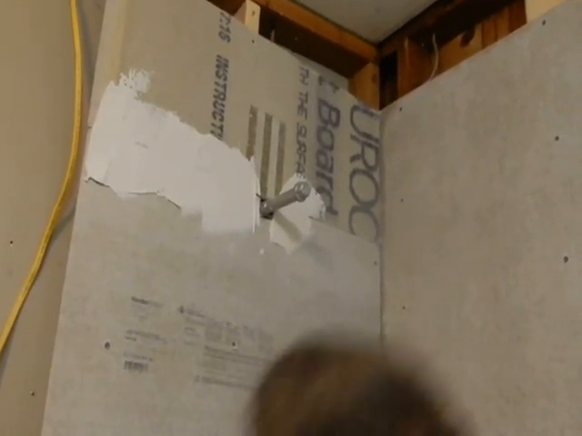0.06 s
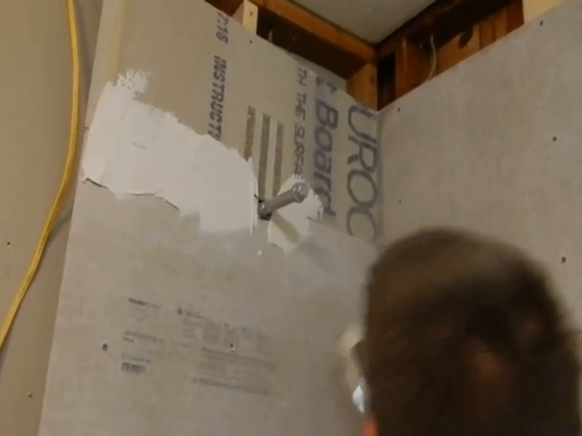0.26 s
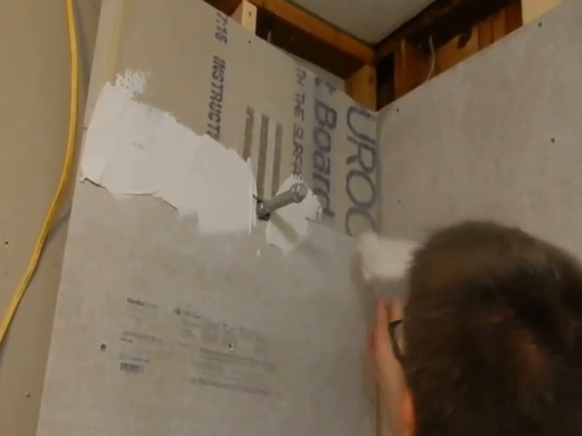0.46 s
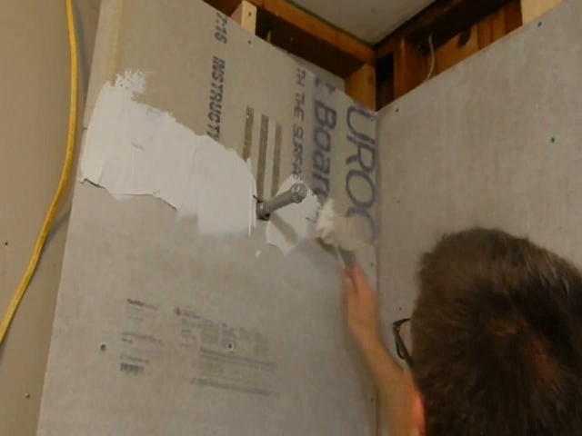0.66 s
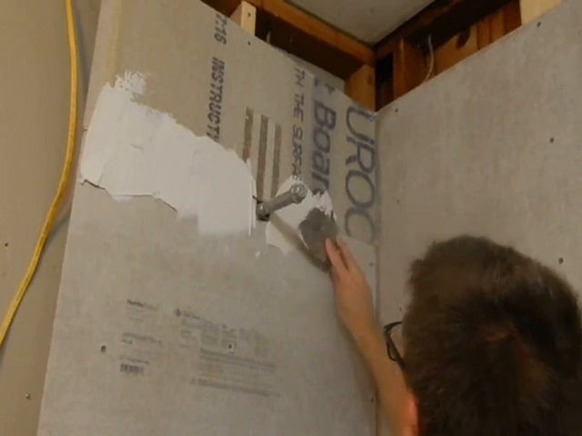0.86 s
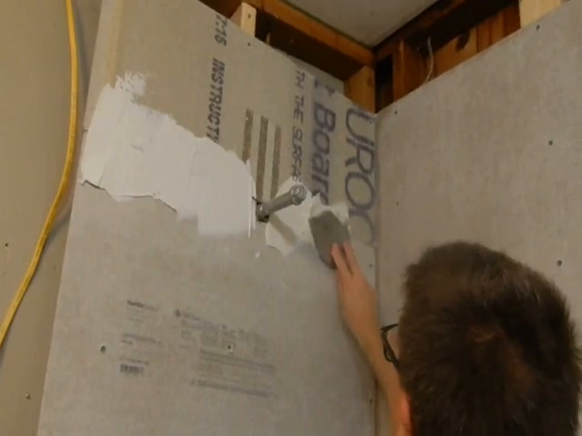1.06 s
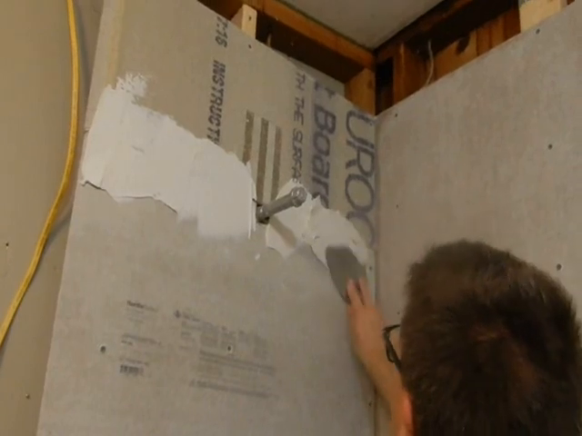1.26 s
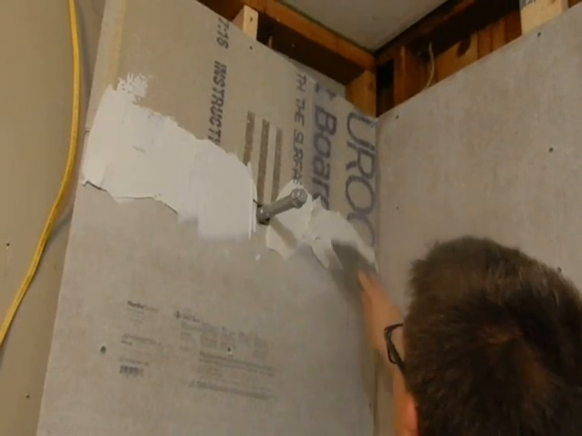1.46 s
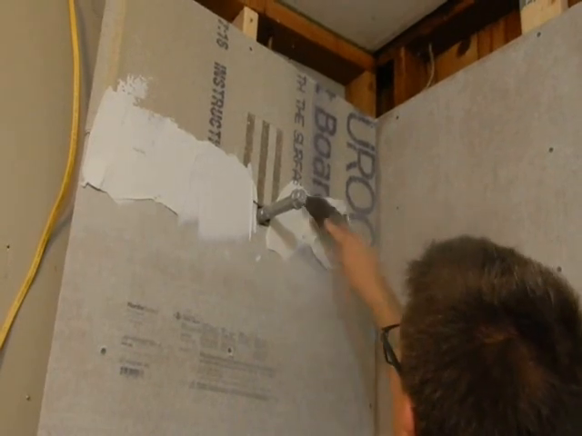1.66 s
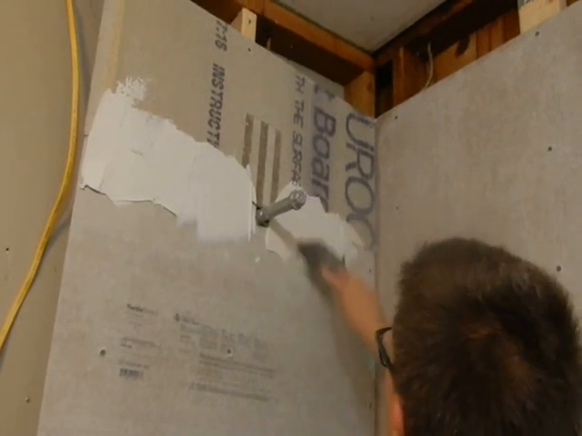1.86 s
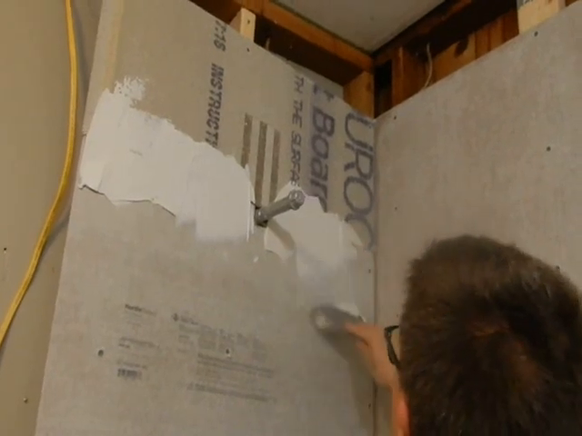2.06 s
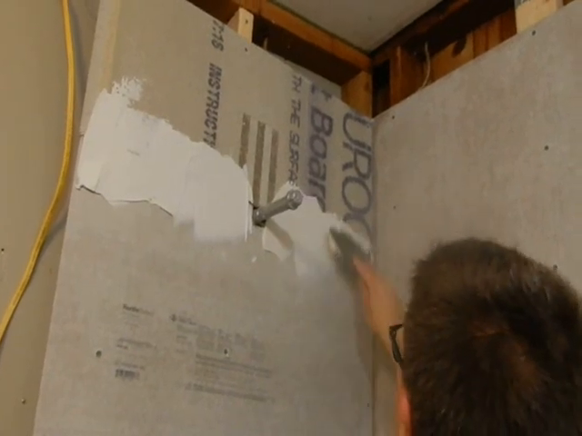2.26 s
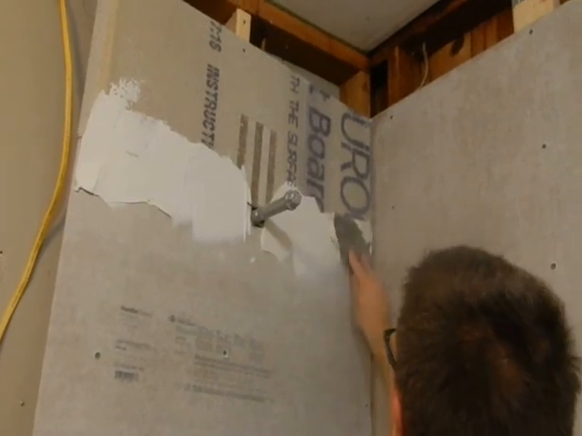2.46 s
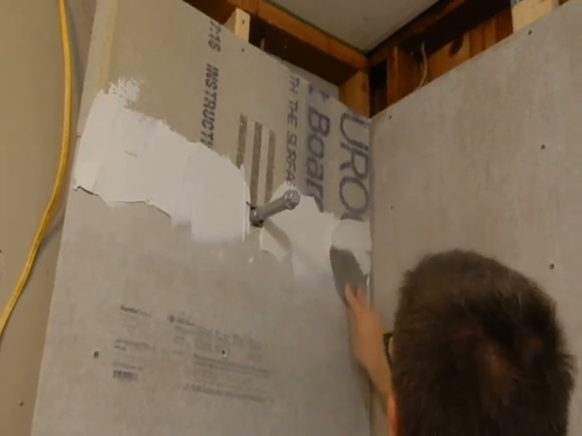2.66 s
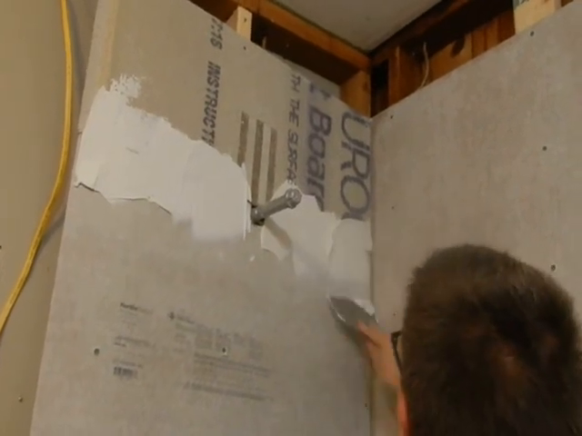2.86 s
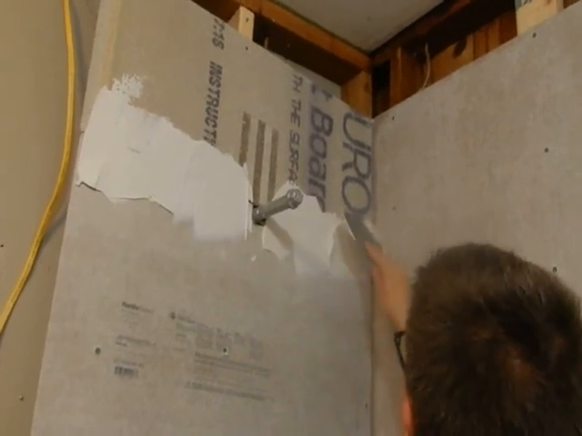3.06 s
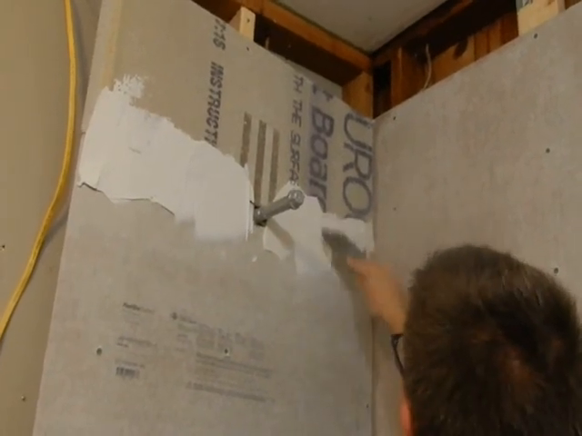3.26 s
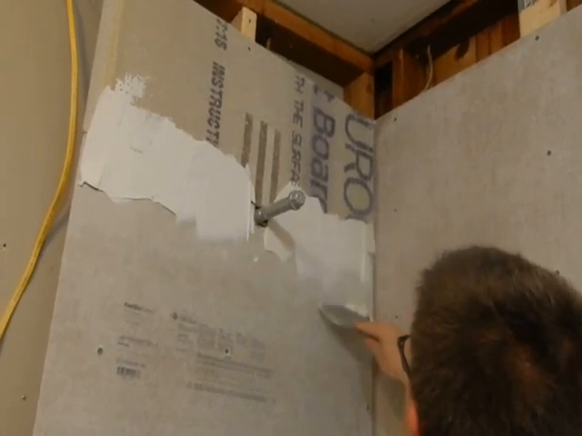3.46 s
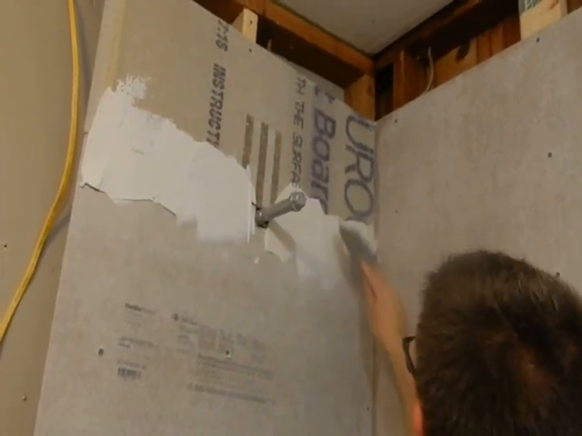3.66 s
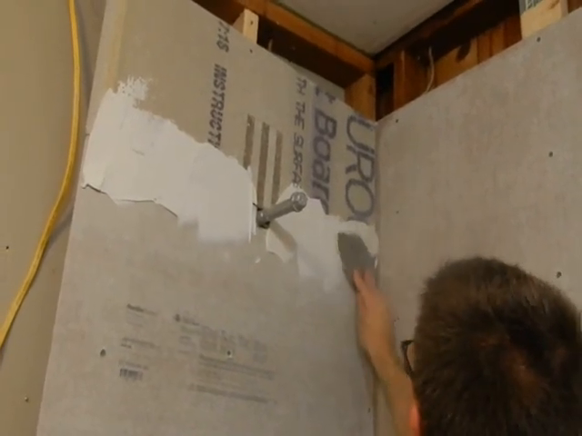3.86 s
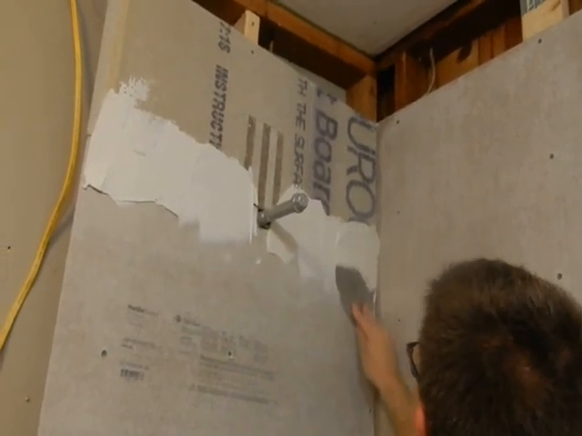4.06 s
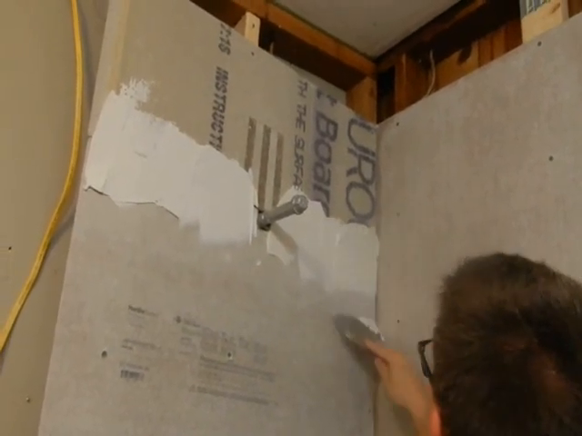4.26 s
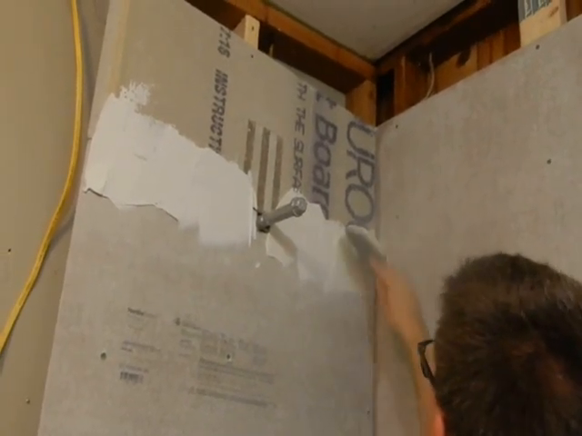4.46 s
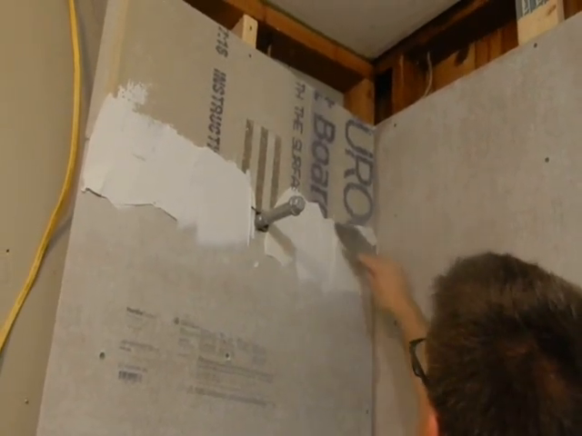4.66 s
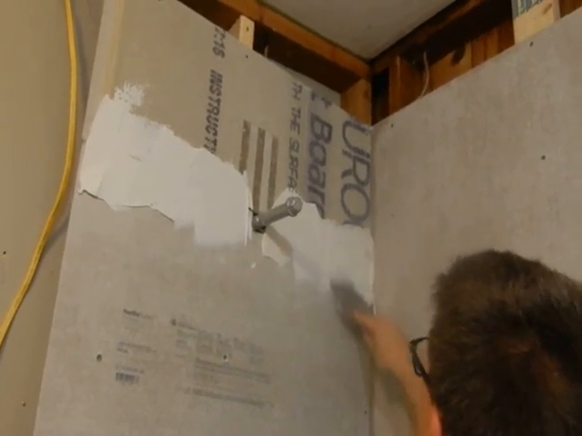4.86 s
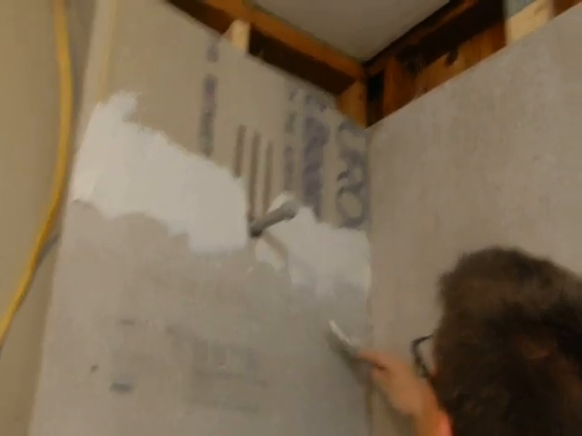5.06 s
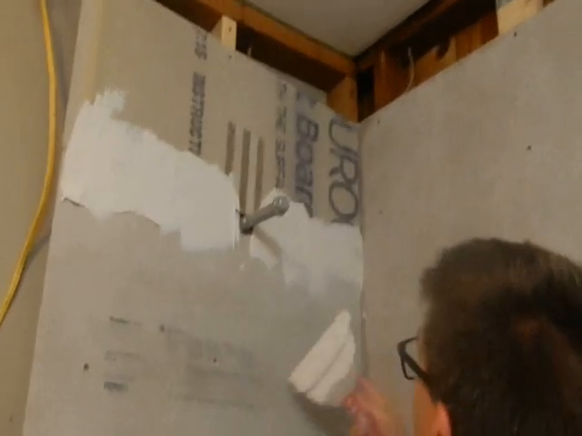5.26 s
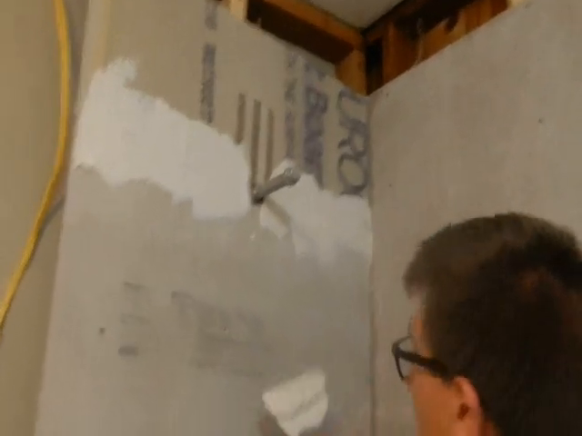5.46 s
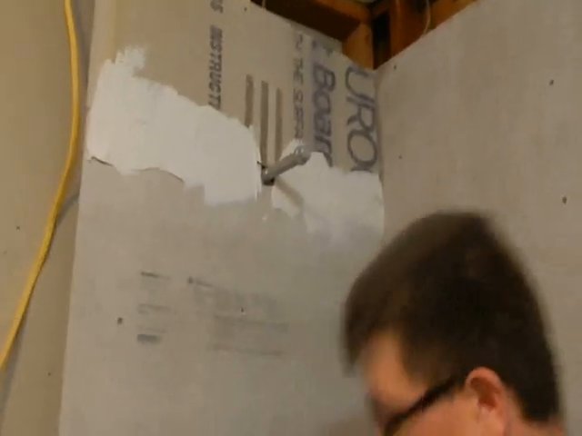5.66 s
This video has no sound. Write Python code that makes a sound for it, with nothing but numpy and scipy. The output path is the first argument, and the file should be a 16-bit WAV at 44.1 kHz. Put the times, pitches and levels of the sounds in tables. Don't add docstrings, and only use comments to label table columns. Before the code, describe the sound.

After over a second of faint rustling grit and room hush, a loosely held steel blade sings briefly, then short gritty scrapes follow in uneven bursts. Slaps crack against the hollow board, the hardest around four seconds, with boomy wall rumble. Close stereo microphone, small reflective bathroom, tail about a third of a second, soft hiss.

```python
import sys
import numpy as np
from scipy import signal
from scipy.fft import rfft
from scipy.io import wavfile
from scipy.ndimage import uniform_filter1d

SR = 44100
rng = np.random.default_rng(int(sys.argv[2]) if len(sys.argv) > 2 else 0)


def how_loud(loudness_db):
    steps = np.asarray(loudness_db, float) / 20
    return 10 ** steps


def store_pcm(level_fs):
    pcm = np.round(np.clip(level_fs, -1, 1) * 32767).astype(np.int16)
    wavfile.write(sys.argv[1], SR, np.atleast_2d(pcm).T)


N = 252252


def evened(x):
    return x / np.sqrt(np.mean(x ** 2) + 1e-20)


def read(points, hz):
    f, value = np.transpose(points)
    return np.interp(np.log(hz + 1), np.log(f + 1), value)


def causal(gain):
    log_gain = np.log(np.maximum(gain / gain.max(), 1e-4))
    full = np.concatenate([log_gain, log_gain[-2:0:-1]])
    spectrum = np.exp(np.conj(signal.hilbert(full)))
    taps = np.fft.ifft(spectrum).real[:len(log_gain)]
    return taps / np.linalg.norm(taps)


def add(mix, s, sound):
    mix[round(s * SR):][:len(sound)] += sound


def swell(t, rise_ms):
    u = 1000 * t / max(rise_ms, 0.1)
    return (u * np.exp(1 - u)) ** 1.28


def hush():
    # frequency in Hz, level in dB per Hz.
    hush_colour = [(12, -38), (20, -23), (116, 5.5), (248, 0.5), (607, -2), (780, -10.5), (1000, -5.5),
                   (1440, -17), (1610, -11.5), (4540, -15), (10800, -23.5), (14700, -29.5), (16000, -47)]
    # frequency in Hz, left-right likeness from 0 to 1.
    likeness = [(60, 0.34), (300, 0.086), (1400, 0.25), (3100, 0.15), (7000, 0.12), (15000, .05)]
    frame_count, hz = N // 256 + 5, np.fft.rfftfreq(1024, 1 / SR)
    a, b, c, d, patches = rng.standard_normal((frame_count, 513, 5)).T
    patches = uniform_filter1d(patches, size=10, axis=0)
    patches = evened(uniform_filter1d(patches, size=12, axis=1))
    same = np.clip(read(likeness, hz), 0, 1)[:, None]
    left = a + 1j * b
    right = same * left + np.sqrt(1 - same ** 2) * (c + 1j * d)
    z = np.array([left, right]) * how_loud(read(hush_colour, hz)[:, None] + 1.6 * patches)
    noise = signal.istft(z, nperseg=1024, noverlap=768)[1][:, :N]
    return how_loud(-52.5) * evened(noise)


def shudder(x):
    level = np.sqrt(np.abs(uniform_filter1d(x ** 2, size=1500)))
    noise = rng.standard_normal((3, N))
    rumble = level ** 0.67 * (noise[:2] * 1.2 + noise[2])
    deep_band = signal.butter(2, [18, 95], "band", fs=SR, output="sos")
    return how_loud(-18.5) * signal.sosfilt(deep_band, rumble)


def modal():
    # mode frequency in Hz, level in dB, t60 in seconds.
    wall_modes = [(149.9, 0.5, 0.72), (200.6, 5.5, 0.47), (216, 0, 0.2), (305, 4, 0.49), (330.5, 8, 0.33),
                  (368.3, -6, 0.25), (462, 7.5, 0.11), (535, -25, 0.73), (595, -5.5, 0.31), (677, 3, 0.15),
                  (697, 11, 0.36), (704, -31, .3), (800, -20, 0.82), (912, 16, 0.11), (991, 1, 0.37),
                  (1050, -28, 0.16), (1128, 13.5, 0.26)]
    t = np.arange(SR // 2) / SR
    out = np.zeros(len(t))
    for f, db, t60 in wall_modes:
        out += how_loud(db - 60 * t / t60) * np.sin(2 * np.pi * (f * t + rng.random()))
    return out / np.linalg.norm(out)


def tail(start):
    # frequency in Hz, t60 in seconds.
    room_t60 = [(150, 0.62), (400, 0.31), (1040, 0.38), (2760, 0.31), (7280, 0.25), (15000, 0.19)]
    taps, at = np.zeros(SR), np.arange(start, SR - 12, 12)
    taps[at + rng.integers(0, 12, len(at))] = rng.choice([-1., 1.], len(at))
    hz, t, z = signal.stft(taps, SR, nperseg=256)
    dying = z * how_loud(-60 * t / read(room_t60, hz)[:, None])
    out = signal.istft(dying, SR, nperseg=256)[1][:32768]
    broad_power = uniform_filter1d(abs(rfft(out)) ** 2, size=60)
    out = signal.oaconvolve(out, causal(broad_power ** -0.5)[:2048])
    return out / np.linalg.norm(out)


def moving(x, start):
    drift_hz = 7.5
    angle = 2 * np.pi * (drift_hz * np.arange(N) / SR + np.arange(3)[:, None] / 3)
    share = np.sqrt((1 + np.cos(angle)) / 3)
    return sum(signal.fftconvolve(x * w, tail(start))[:N] for w in share)


def bathroom(x, direct=0.82):
    # frequency in Hz, difference between the ports in dB.
    port_difference = [(60, -13), (99, -14), (160, -24), (270, -20), (450, -22), (740, -22), (1220, -27),
                       (2010, -21), (3330, -17), (5500, -16.5), (9080, -9.5), (15000, -2)]
    low = signal.sosfilt(signal.butter(4, 1200, fs=SR, output="sos"), x)
    mid = direct * x + 0.57 * moving(x - 0.4 * low, 60)
    mid += 0.072 * signal.fftconvolve(low, modal())[:N]
    apart = how_loud(read(port_difference, np.fft.rfftfreq(4096, 1 / SR)))
    side = signal.oaconvolve(moving(x, 10), causal(apart))[:N] * np.sqrt(np.mean(apart ** 2))
    side = side + 0.057 * signal.lfilter([0.08], [1, -0.92], mid) + 0.034 * mid
    return np.array([mid + side, mid - side])


def bodies(colour):
    seams_hz = [1250, 3300, 6000]
    # centre in Hz, width in Hz, depth in dB.
    notch = (1380, 290, -4.5)
    dip_hz, dip_width, dip_db = notch
    hz = np.fft.rfftfreq(8192, 1 / SR)
    dip = 1 - (1 - how_loud(dip_db)) / (1 + (2 * (hz - dip_hz) / dip_width) ** 2)
    below = [0 * hz]
    below += [1 / (1 + (hz / f) ** n) for f, n in zip(seams_hz, (12, 6, 6))]
    below += [1 + 0 * hz]
    whole = how_loud(read(colour, hz)) * dip
    return [causal(whole * np.sqrt(np.maximum(b - a, 0))) for a, b in zip(below, below[1:])]


def thuds():
    # start in seconds, peak in dB, pitch in Hz,
    # rise in ms.
    wall_thuds = [(0.689, -49, 207, 9.5), (0.892, -40.5, 236, 6.4), (1.171, -44, 203, 6.9),
                  (1.501, -30.5, 266, 17), (1.578, -32, 242, 9.5), (1.884, -32.5, 223, 5.2),
                  (2.593, -26, 218, 5.7), (2.638, -29.5, 163, 6.8), (3.4, -21, 157.4, 10.6),
                  (3.429, -23.5, 279, 4.3), (3.979, -35.5, 250, 17), (5.074, -24.5, 243.5, 9),
                  (1.55, -33.5, 165, 8.5), (1.601, -33.5, 120, 18), (1.97, -25.5, 569, 16),
                  (3.403, -21.5, 152, 13.8), (3.45, -43, 74.6, 21), (4.519, -37.5, 284, 16),
                  (4.806, -22, 169.7, 20)]
    out, t = np.zeros(N), np.arange(5000) / SR
    for s, db, hz, rise_ms in wall_thuds:
        boom = np.sin(2 * np.pi * hz * t)
        boom += 0.53 * np.sin(2 * np.pi * 1.75 * hz * t) * np.exp(-t / 0.012)
        add(out, s, how_loud(db - 4) * boom * swell(t, rise_ms))
    return out


def ticks():
    # start in seconds, peak in dB, shares of blade and air in dB, rise in ms.
    corner_ticks = [(.5923, -45.5, 4, -1, 0.76), (1.87, -39.5, -4, -4, 1.2),
                    (1.9627, -20.5, -16, -6.5, 0.83), (2.586, -48, 2, 3.5, 1.3), (3.898, -62, 6, 3, 1.3),
                    (3.972, -34.5, 6, 7.5, 0.61), (5.461, -27, -6, -6, 0.7)]
    # start in seconds, peak in dB, shares of blade and air in dB, rise in ms.
    edge_bites = [(1.4862, -30, 11, 7.5, 8), (1.923, -34, -7, -12, 7.9), (2.1844, -33.5, -20, 6, 14),
                  (2.921, -32, 2, -13, 12), (3.604, -41, -8, -8, 5), (3.6319, -32, 7.5, -5.5, 5.2),
                  (4.197, -32.5, -5, -13, 9.7), (5.1167, -52, 18, 6, 9.6)]
    events = corner_ticks + edge_bites
    out, t = np.zeros((4, N)), np.arange(3000) / SR
    for (s, db, *shares, rise_ms), noise in zip(events, rng.standard_normal((len(events), len(t)))):
        for k, share in enumerate([-15, 0] + shares):
            add(out[k], s, how_loud(db + share + 1) * noise * swell(t, rise_ms))
    return out


def slaps():
    # start in seconds, peak in dB, shares of edge, blade and air in dB.
    slap_hits = [
        (2.7044, -9, 0.5, 2.5, -8),
        (3.3952, -30, -5, -25, -9.5),
        (4.0416, -6.5, -3.5, -5, -12),
        (4.8038, -10, 2.5, 5, -2),
    ]
    # frequency in Hz, level in dB per Hz.
    slap_colour = [(71, -48), (120, -20), (177, -14.5), (348, -3), (473, -10.5), (605, 4.5), (698, -2),
                   (757, -15), (930, -9), (1460, -24.5), (2020, -17), (2990, -12.5), (4140, -21.5),
                   (14700, -61), (16000, -55)]
    rattle_ms = [19.5, 23, 8.8, 12.8]
    layer_db = [0.5, -1.14, -0.6, -0.91]
    out, t = np.zeros((4, N)), np.arange(3000) / SR
    for (s, db, *shares), noise in zip(slap_hits, rng.standard_normal((len(slap_hits), len(t)))):
        for k, share in enumerate([0] + shares):
            burst = (0.54 * noise - 2.64 * (t == 0)) * np.exp(-1000 * t / rattle_ms[k])
            add(out[k], s, how_loud(db + share + layer_db[k]) * burst)
    return sum(signal.oaconvolve(x, b)[:N] for x, b in zip(out, bodies(slap_colour)))


def grit(per_s, spread_db, lumps_db):
    size = how_loud(spread_db * np.minimum(rng.exponential(1, N), 4)) * rng.choice([-1., 1.], N)
    slow = signal.butter(2, 90, fs=SR, output="sos")
    clumps = evened(signal.sosfilt(slow, rng.standard_normal(N)))
    caught = rng.random(N) < per_s / SR
    return evened(size * caught * how_loud(lumps_db * clumps))


def stroke(t, rise, fall):
    up = np.clip(t / max(rise, 0.002), 0, 1) ** 1.11
    release_db = -23 * (np.maximum(t - rise, 0) / max(fall, 0.01)) ** 1.67
    return (up * how_loud(release_db)) ** 2


def pressure():
    # start, rise and fall in seconds, pressure in dB, speed in dB.
    swipes = [(.24, 0.038, .15, -56.5, 2), (1.1, 0.053, 0.18, -50, -2.5), (1.3, 0.086, 0.18, -51.5, 5),
              (1.83, .03, .05, -51, -4), (1.86, .012, 0.16, -42.5, -6.5), (1.92, 0.051, 0.11, -32, 1),
              (2.09, 0.021, .1, -46, 4.5), (2.16, 0.072, 0.073, -19, 2.5), (2.4, 0.072, .15, -65.5, 13.5),
              (2.95, .095, .12, -28.5, 2), (3.4, 0.018, 0.13, -53.5, 4.5), (3.5, 0.07, 0.092, -51.5, 3.5),
              (3.6, 0.054, 0.077, -20.5, 2), (3.962, .008, 0.11, -50, 4.5),
              (4.22, 0.039, 0.39, -29.5, -5.5), (4.34, 0.11, 0.072, -25.5, 1),
              (4.85, 0.026, 0.18, -33, -3.5), (4.99, 0.015, 0.11, -35, -2), (5.09, 0.073, 0.099, -25.5, 4),
              (5.14, 0.053, 0.13, -23.5, -0.5), (5.29, 0.083, 0.073, -25, -2), (5.63, 0.12, 0.24, -41.5, 0)]
    # start, rise and fall in seconds, pressure in dB, speed in dB.
    skims = [(0, 0.0017, 0.36, -44.5, 2.5), (.08, 0.087, 0.095, -47, 1.5), (.44, .02, .12, -60, 8),
             (.58, 0.0087, 0.04, -59, 9), (.77, 0.03, 0.12, -56.5, 4), (.97, 0.02, 0.047, -60, 6),
             (1.487, 0.0097, .09, -18, -5), (1.53, 0.038, 0.06, -31.5, 2.5), (1.67, 0.05, 0.091, -43, 1),
             (1.93, 0.025, 0.032, -32, 0), (2.58, 0.022, 0.16, -54, 2), (2.83, 0.026, 0.057, -33.5, 4.5),
             (2.913, 0.013, 0.19, -30.5, -3), (3.88, 0.054, 0.077, -48, 1), (4.19, 0.011, .16, -31.5, -2),
             (4.23, .06, .13, -35, -10), (5.455, 0.0068, 0.11, -36.5, 6)]
    # start, rise and fall in seconds, pressure in dB, speed in dB.
    presses = [(0, 0.0043, .3, -49, -13), (.27, 0.057, 0.17, -57, 8), (.5, 0.14, 0.14, -59, -3),
               (.86, .035, .05, -56, -5), (1.13, .04, .1, -51.5, -3), (1.5, 0.032, 0.19, -38.5, 8),
               (1.862, .015, .08, -44.5, -2), (1.95, 0.035, 0.087, -29.5, -5),
               (2.23, 0.05, 0.088, -34.5, 11), (2.57, 0.02, 0.078, -43, 0.5), (2.71, 0.021, 0.12, -21, 3),
               (2.78, 0.029, 0.12, -34.5, 7.5), (2.92, 0.091, 0.15, -27.5, -0.5),
               (3.4, .018, .06, -38, -2.5), (3.64, .025, 0.062, -41, -4), (3.5, .015, .06, -51, -3),
               (3.98, 0.037, 0.057, -44, -6), (4.048, 0.024, 0.074, -20, -1), (4.09, 0.045, 0.14, -31, 4.5),
               (4.4, 0.045, 0.094, -29.5, 0), (4.81, 0.021, 0.047, -15, -2), (4.85, 0.025, 0.19, -31, 0),
               (5.03, .03, 0.097, -39, -1), (5.17, .04, 0.064, -31, -2)]
    grips = [(swipes, (-11, 0, -2, -3.5), (-0.72, -0.043, -0.1, 0.98)),
             (skims, (-14, -9, 0.5, -5.5), (0.83, -0.38, -0.041, 1)),
             (presses, (-2, -11, -16, -25.5), (0.27, 1.5, 1.4, 2))]
    t, power = np.arange(N) / SR, np.full((4, N), 1e-10)
    for rows, shares, per_speed in grips:
        for s, rise, fall, db, speed_db in rows:
            on = slice(round(s * SR), round((s + rise + 3 * fall) * SR))
            layer_gain = how_loud(db + np.add(shares, speed_db * np.array(per_speed)))
            power[:, on] += layer_gain[:, None] ** 2 * stroke(t[on] - s, rise, fall)
    _, edge, blade, air = 10 * np.log10(uniform_filter1d(power, size=900) + 1e-12)
    sing = np.clip(0.33 + (blade - np.maximum(edge, air)) / 3.6, 0, 1)
    light = np.clip((-28.5 - blade) / 17, 0, 1)
    pressed_hz, free_hz, bent_hz = 3720, 250, 275
    ring = pressed_hz + sing * (free_hz + bent_hz * (1 - light))
    return np.sqrt(power), ring, sing, 1.5 * light


def resonate(x, hz, width):
    turn = np.exp(2j * np.pi * np.cumsum(hz) / SR)
    r = np.exp(-np.pi * width / SR)
    return 2 * (turn * signal.lfilter([1 - r], [1, -r], x / turn)).real


def trowel():
    # frequency in Hz, level in dB per Hz.
    scrape_colour = [(15, -27), (25, -30), (92, -16), (270, 0), (405, -5.5), (560, 2), (607, -0.5),
                     (1100, -9), (1370, -13), (1700, -8), (2050, -3.5), (3520, 0), (8360, -9.5),
                     (14800, -26.5), (16000, -27)]
    drive, ring, sing, light = pressure()
    shared = grit(5000, 1.46, 1.2)
    force = [d * (0.57 * shared + 0.75 * grit(9000, 4.37, 3.1)) for d in drive]
    layers = zip(force, ticks(), bodies(scrape_colour))
    out = [signal.oaconvolve(f + k, b)[:N] for f, k, b in layers]
    blade = out[2]
    modes = resonate(blade, ring, 190) + 1.47 * resonate(blade, 1.163 * ring, 570)
    modes += light * resonate(blade, 1.37 * ring, 410)
    out[2] = np.sqrt(np.clip(1 - 0.77 * sing, 0, 1)) * blade + 0.93 * np.sqrt(sing) * modes
    return sum(out) + slaps() + thuds()


def scene():
    work = trowel()
    return bathroom(work) + shudder(work) + hush() * how_loud([[0.7], [-0.7]])


def low_pass(x):
    return signal.sosfilt(signal.butter(12, 16810, fs=SR, output="sos"), x)


def record(dry):
    band_limit = signal.firwin(255, 15900, window=("kaiser", 6), fs=SR)
    heard = signal.oaconvolve(0.7 * np.tanh(dry / 0.63), band_limit[None], "same")
    return low_pass(heard)


dry = scene()
out = record(dry)
store_pcm(out)
```